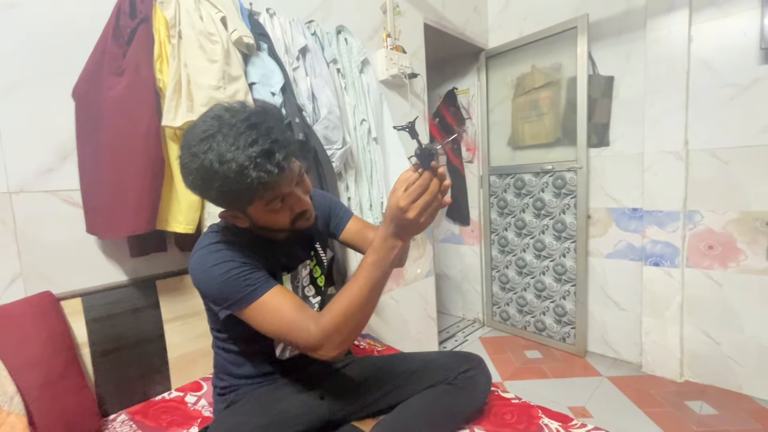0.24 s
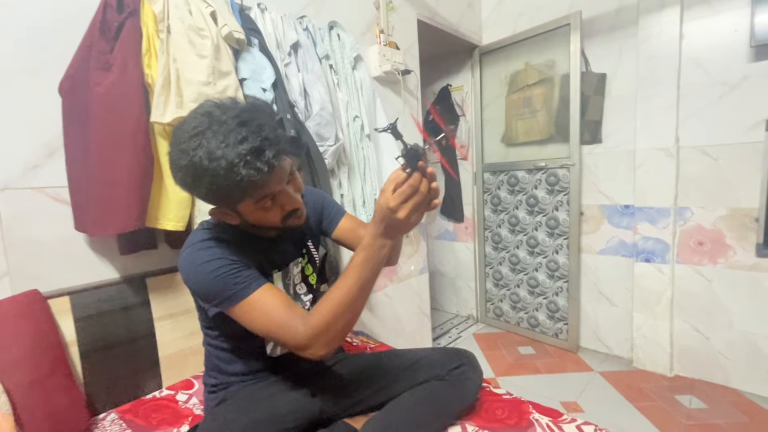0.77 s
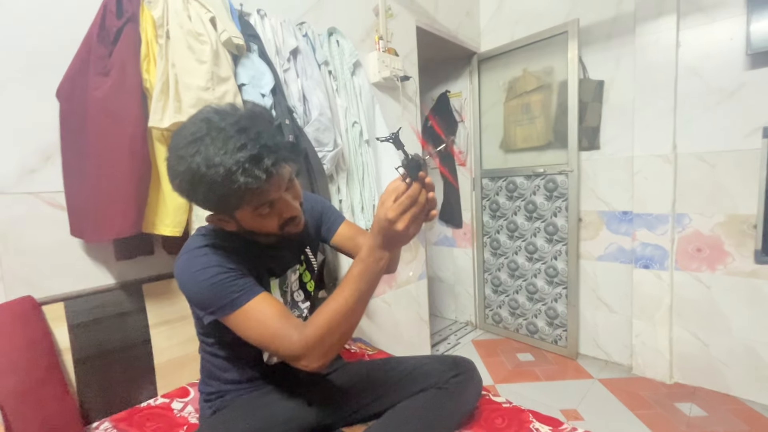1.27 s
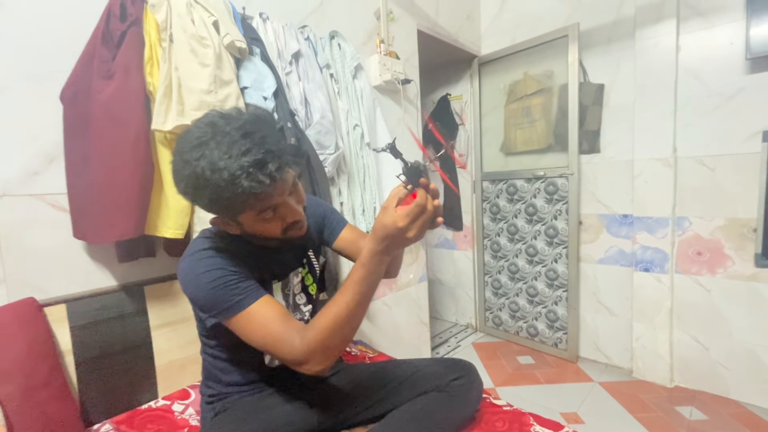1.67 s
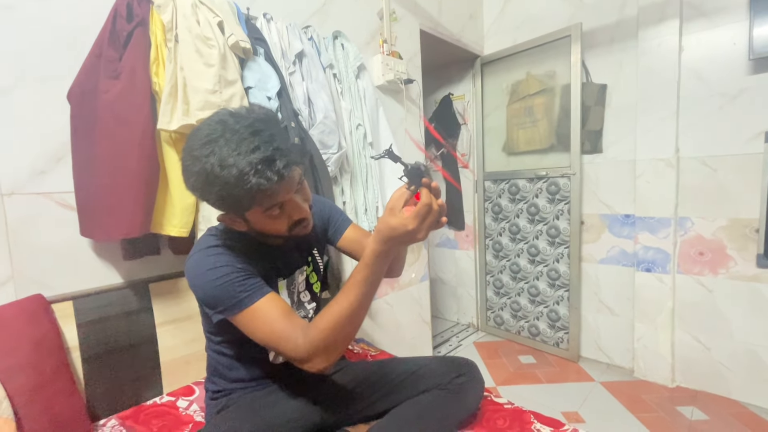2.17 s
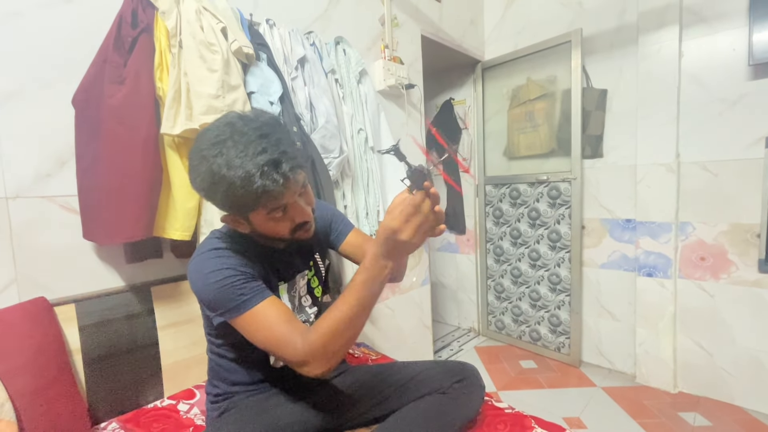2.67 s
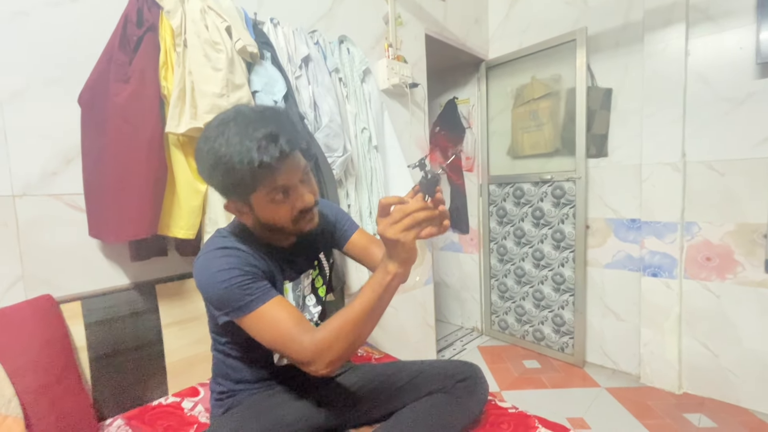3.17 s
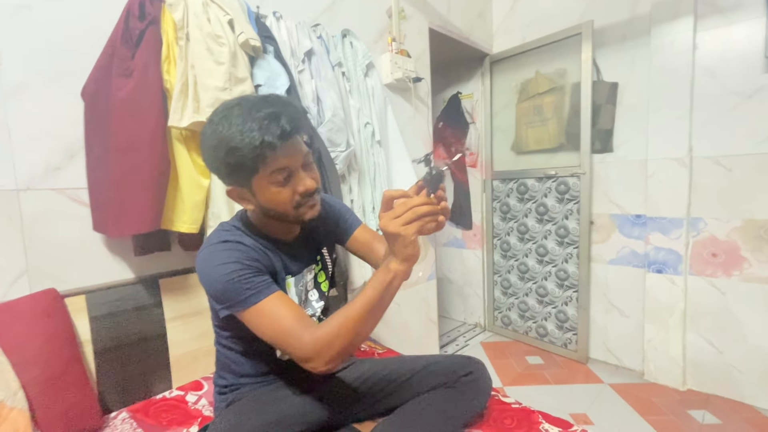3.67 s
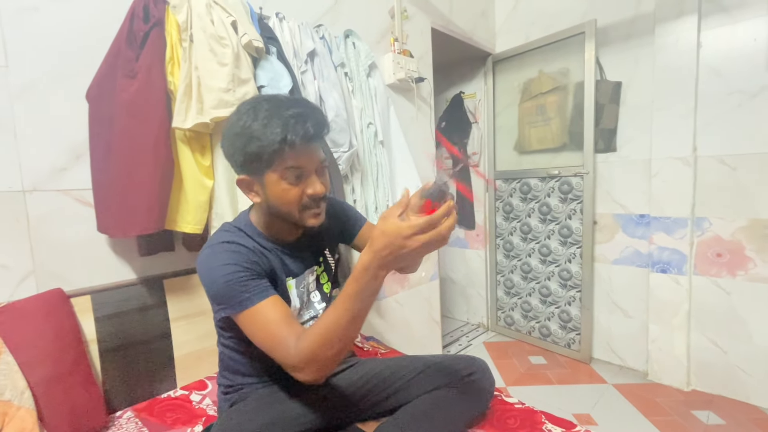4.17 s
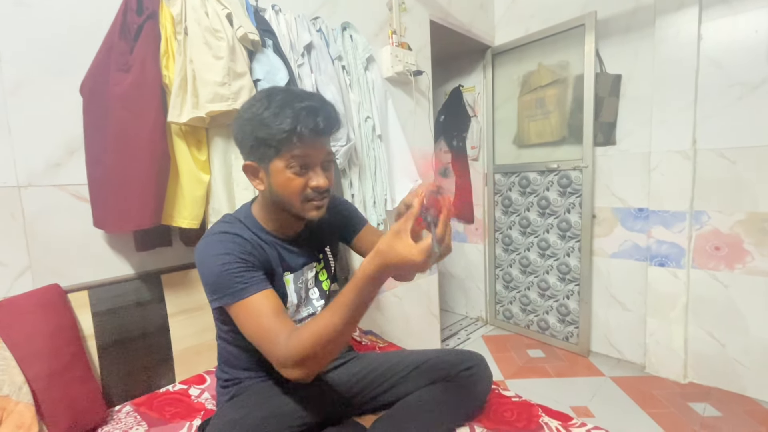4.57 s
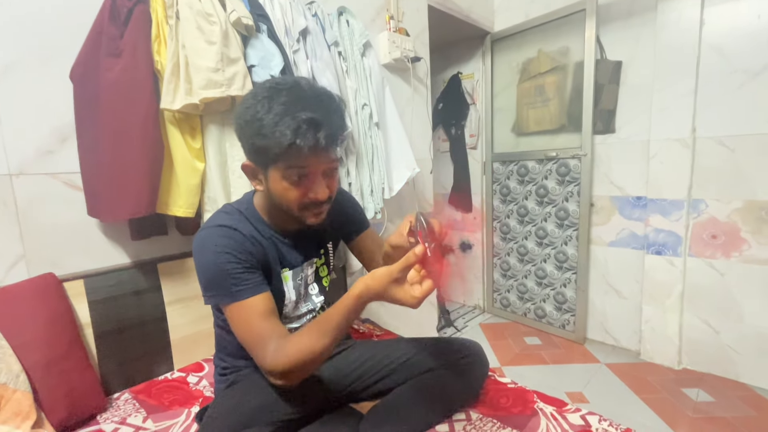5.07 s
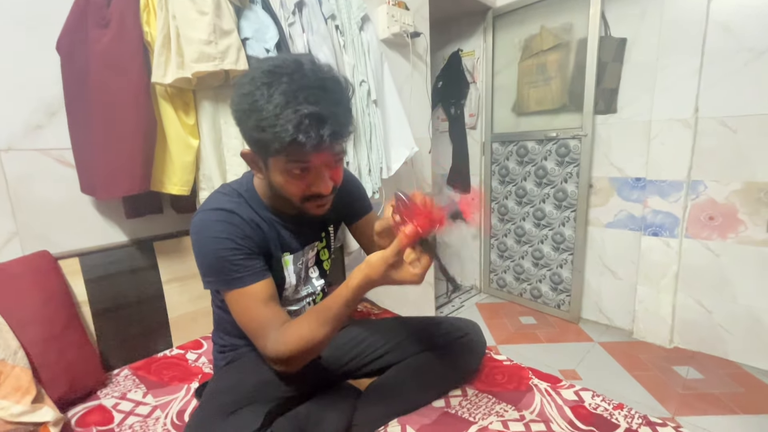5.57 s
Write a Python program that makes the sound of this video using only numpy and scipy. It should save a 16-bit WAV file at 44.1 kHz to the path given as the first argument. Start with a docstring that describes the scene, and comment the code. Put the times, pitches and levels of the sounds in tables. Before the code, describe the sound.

A toy helicopter is already running, close by and slightly to the left in a small tiled room. Its motor and gears make a high whine with a dense plastic rattle and blade hiss. The pitch wavers, rising around 1.5 seconds and dipping near 2. From about 3 to 4 seconds it stays higher and gains a thin, very high edge; a finger ticks faintly on the body at about 3.4 seconds. The pitch sags at 4.5 seconds and climbs again briefly. At about 4.7 seconds the power cuts: the whine falls and vanishes quickly, and the rattle fades over the next half second, with several light shell clicks before 5 seconds. One more click comes near 5.8 seconds. A faint low hum and steady room noise lie underneath throughout.

```python
"""A wavering gear whine and plastic rattle fill a small tiled room: a hand-held toy helicopter is running.
A tiny motor drives the rotor through two pairs of gears, whose teeth sound at the meshing rate and its
harmonics and rattle in the thin shell. Then the power is cut, the gears coast down clattering,
and a finger clicks on the shell. A low hum and room noise lie underneath."""
import sys
import numpy as np
from scipy import signal
from scipy.fft import rfft, irfft, next_fast_len
from scipy.io import wavfile

SR = 44100
rng = np.random.default_rng(int(sys.argv[2]) if len(sys.argv) > 2 else 0)


def output_pcm(signal):
    """Save a mono or channel-first signal as 16-bit PCM at the path in sys.argv[1].

    Samples are clipped to [-1, 1] before scaling.
    """
    pcm = np.clip(np.atleast_2d(signal).T, -1, 1) * 32767
    wavfile.write(sys.argv[1], SR, np.round(pcm).astype(np.int16))


N = 256794
PINION_TEETH, IDLER_TEETH = 8, 21
SHELL_LOW_HZ, SHELL_MID_HZ, SHELL_TOP_HZ = 2960, 6184, 11520   # resonances of the shell
STEP = 40   # samples between values of a slow random drift

# Uneven tooth contact, relative levels: time_s, fundamental_blur_db, second_blur_db, rattle_db
ROUGHNESS = [(0.0, -19, -22, -24.5), (0.37, -16, -15, -26), (0.88, -29, -13, -23),
             (0.91, -19.5, -30, -24.5), (0.93, -26, -19, -25.5), (1.33, -14.5, -12.5, -26.5),
             (1.36, -26, -15, -27), (1.46, -28, -16, -25), (1.7, -19, -16, -27),
             (1.74, -17.5, -15.5, -26.5), (2.19, -22, -14, -24.5), (2.62, -18, -15.5, -25.5),
             (2.83, -15.5, -19, -24), (2.89, -40, -18, -27.5), (2.92, -6.5, -15, -24),
             (3.04, -20, -15, -24.5), (3.26, -20, -23, -25), (3.31, -34, -38, -25), (3.5, -17, -24, -23),
             (3.6, -37, -15, -26), (3.66, -17, -19, -24), (3.71, -31, -24, -24.5), (3.81, -26, -23, -23.5),
             (3.82, -29, -18, -23), (3.87, -12, -26, -24.5), (3.89, -34, -31, -23), (3.97, -17, -29, -26),
             (4.02, -33, -30, -23.5), (4.03, -16, -34, -24.5), (4.21, -20, -32, -23),
             (4.27, -10.5, -15, -23.5), (4.32, -14, -17, -26), (4.45, -5, -14, -25.5),
             (4.47, -10, -12, -27), (4.55, -11.5, -20, -29.5), (4.58, -5, -21, -28), (4.61, -7, -16, -25.5),
             (4.72, -16.5, -11.5, -26.5), (4.74, -23, -42, -36), (4.77, -17.5, -25, -33.5),
             (4.81, -30, -20, -33), (4.82, -9, -22, -33), (4.85, -19, -26, -34.5), (4.9, -24, -19, -34),
             (4.93, -27, -27, -36), (4.98, -20, -19.5, -38), (5.0, -20, -23, -35),
             (5.17, -32.5, -32, -46.5), (5.38, -42, -30, -48.5), (5.77, -64, -54, -65)]


def gear_motion():
    """Meshing rate is shaft speed times tooth count; the force on the teeth collapses at the power cut."""
    # Pinion under power: time_s, mesh_hz
    powered = [(0.0, 3363), (0.11, 3226), (0.3, 3112), (0.33, 3125), (0.4, 3207), (0.49, 3292),
               (0.62, 3359), (0.85, 3380), (1.01, 3357), (1.19, 3354), (1.23, 3390), (1.29, 3526),
               (1.4, 3721), (1.46, 3802), (1.48, 3814), (1.5, 3789), (1.58, 3614), (1.68, 3333),
               (1.71, 3257), (1.82, 3149), (1.92, 3104), (2.0, 3141), (2.16, 3292), (2.28, 3340),
               (2.57, 3370), (2.83, 3349), (2.88, 3407), (2.97, 3628), (3.02, 3697), (3.18, 3811),
               (3.32, 3835), (3.54, 3791), (3.79, 3774), (4.05, 3705), (4.21, 3547), (4.27, 3461),
               (4.38, 3283), (4.48, 3066), (4.52, 3020), (4.54, 3011), (4.57, 3030), (4.61, 3101),
               (4.68, 3359), (4.73, 3491)]
    # Pinion coasting: time_s, mesh_hz
    coasting = [(4.77, 3400), (4.82, 2800), (4.9, 2050), (5.0, 1600), (5.1, 1900), (5.351, 1130),
                (5.82, 700)]
    mesh_hz, = in_time(powered + coasting)
    cut_s, drop_db, fade_db_per_s = 4.727, -11, 120
    t = np.arange(N) / SR
    load = amp(np.where(t > cut_s, drop_db - fade_db_per_s * (t - cut_s), 0))
    return mesh_hz, load


def harmonic_levels(mesh_hz):
    """Resonance: the third mesh harmonic stands out only while it lies in the shell's top band."""
    # Mesh harmonics before that weighting: time_s, fundamental_db, second_db, third_db
    harmonics = [(0.0, -33, -34, -42), (0.1, -24, -33, -41), (0.2, -30, -32, -40), (0.3, -26, -35, -43),
                 (0.4, -26, -32, -42), (0.5, -25, -28, -38), (0.6, -22, -30, -42), (0.7, -23, -30, -41),
                 (0.8, -21, -27, -42), (0.9, -22, -27, -43), (1.0, -24, -29, -42), (1.1, -23, -29, -46),
                 (1.2, -22, -31, -43), (1.3, -26, -28, -42), (1.4, -32, -30, -40), (1.5, -27, -32, -38),
                 (1.6, -31, -32, -43), (1.7, -27, -31, -42), (1.8, -27, -32, -42), (1.9, -27, -31, -43),
                 (2.0, -25, -31, -41), (2.1, -27, -27, -41), (2.2, -27, -29, -41), (2.3, -22, -30, -40),
                 (2.4, -26, -29, -40), (2.5, -27, -31, -39), (2.6, -29, -30, -41), (2.7, -28, -30, -41),
                 (2.8, -23, -27, -42), (2.9, -22, -28, -39), (3.0, -22, -28, -37), (3.1, -25, -31, -31),
                 (3.2, -26, -32, -27), (3.3, -28, -29, -27), (3.4, -28, -28, -28), (3.5, -27, -30, -31),
                 (3.6, -28, -27, -34), (3.7, -21, -28, -31), (3.8, -16, -29, -30), (3.9, -21, -29, -33),
                 (4.0, -21, -28, -37), (4.1, -23, -30, -43), (4.2, -24, -33, -43), (4.3, -22, -31, -44),
                 (4.4, -28, -30, -39), (4.5, -27, -29, -41), (4.6, -25, -31, -40), (4.7, -26, -23, -38)]
    fundamental_db, second_db, third_db = in_time(harmonics)
    detuning = (3 * mesh_hz - SHELL_TOP_HZ) / 700   # in half-widths of the resonance
    return fundamental_db, second_db, third_db - 10 * np.log10(1 + detuning ** 4)


def gear_whine(turns, levels_db):
    """Periodic forcing: the pinion's teeth engage at a regular rate and radiate a harmonic series."""
    mesh_phase = 2 * np.pi * PINION_TEETH * turns
    return sum(amp(level_db) * wavering_tone(k * mesh_phase, flicker_db=1.6, wander_rad=.45, apart_rad=.3)
               for k, level_db in enumerate(levels_db, 1))


def gear_sidebands(turns, mesh_hz, third_db):
    """Modulation: out-of-round gears add tones at sums of multiples of the motor and idler rates."""
    # Side tones (half orders come from alternating strong and weak turns): motor_order, idler_order
    orders = [(1, 0), (4, 0), (5, 0), (0, 8), (0, 16), (0, 17), (0, 24), (0, 32), (6.5, 0), (7, 0),
              (7.5, 0), (8, -1), (8, 1), (8.5, 0), (8, 8), (13, 0), (13.5, 0), (14.5, 0), (15, 0),
              (15.5, 0), (16, -1), (16.5, 0), (17, 0), (17.5, 0)]
    # Their strengths: low_speed_db, high_speed_db
    levels = [(-55, -50), (-53, -55), (-58, -52), (-38, -39), (-46, -37), (-52, -42), (-54, -45),
              (-46, -44), (-43, -55), (-35, -35), (-39, -51), (-47, -43), (-42, -33), (-36, -51),
              (-51, -45), (-48, -44), (-41, -46), (-36, -48), (-40, -32), (-34, -48), (-42, -41),
              (-33, -46), (-35, -37), (-39, -50)]
    # Sidebands of the third harmonic: motor_order, idler_order
    top_orders = [(24, -1), (24, 1), (25, 0), (25, 1)]
    # Their strengths relative to that harmonic: level_db
    top_levels = [-10, -5, -5, -10]
    low_speed_hz, high_speed_hz = 3500, 3750
    fast = np.clip((mesh_hz - low_speed_hz) / (high_speed_hz - low_speed_hz), 0, 1)
    motor_phase = 2 * np.pi * turns
    idler_phase = motor_phase * PINION_TEETH / IDLER_TEETH
    out = np.zeros((2, N))
    for (motor, idler), (low_db, high_db) in zip(orders, levels):
        phase = motor * motor_phase + idler * idler_phase
        gain = amp(low_db) + fast * (amp(high_db) - amp(low_db))
        out += gain * wavering_tone(phase, flicker_db=2, wander_rad=.6, apart_rad=.5)
    for (motor, idler), level_db in zip(top_orders, top_levels):
        phase = motor * motor_phase + idler * idler_phase
        gain = amp(third_db + level_db)
        out += gain * wavering_tone(phase, flicker_db=7.5, wander_rad=.9, apart_rad=.81)
    return out


def tooth_blur(mesh_hz, load):
    """Random modulation: no two teeth meet alike, which spreads bands of noise round the tones."""
    # Bands at the fundamental, second harmonic and top shell resonance: half_width_hz, gain_db
    bands = [(260, -5), (700, -4), (430, -2)]
    # Hiss in the top resonance, relative level: time_s, level_db
    top_hiss = [(0.0, -34), (0.04, -30), (0.06, -34), (0.57, -41), (1.28, -37), (1.33, -25), (1.37, -33),
                (1.44, -28), (1.62, -39), (2.32, -37), (2.69, -35), (2.77, -26), (2.86, -30), (2.99, -23),
                (3.24, -25), (3.32, -31), (3.33, -27), (3.61, -31), (3.62, -25), (3.86, -27), (3.94, -19),
                (3.96, -23), (4.0, -14), (4.08, -25), (4.57, -41), (4.6, -34), (4.73, -37)]
    fundamental_db, second_db, _ = in_time(ROUGHNESS)
    levels_db = [fundamental_db, second_db, in_time(top_hiss)[0] + 20 * np.log10(load)]
    # the shell's resonances keep the bands from following the speed fully
    centres_hz = [np.maximum(mesh_hz, SHELL_LOW_HZ),
                  .7 * 2 * mesh_hz + .3 * SHELL_MID_HZ,
                  np.full(N, SHELL_TOP_HZ)]
    phases = 2 * np.pi * np.cumsum(centres_hz, axis=1) / SR
    out = 0
    for (half_width_hz, gain_db), phase, level_db in zip(bands, phases, levels_db):
        lowpass = signal.butter(2, half_width_hz, fs=SR, output="sos")
        uneven = signal.sosfilt(lowpass, rng.standard_normal((2, 2, N)))
        band = uneven[0] * np.cos(phase) + uneven[1] * np.sin(phase)
        flicker_db = 2 * per_sample(drift(corner_hz=49))
        out = out + amp(level_db + gain_db + flicker_db) * rms_one(band)
    return stereo(out, treble_lags=True)


def rattle(ticks_per_s, spread_db, gain_db):
    """Shot noise: random ticks of loose teeth and air hiss from the blades, filtered by the shell."""
    # Response of the thin shell: frequency_hz, gain_db
    shell = [(470, -48), (800, -18), (1010, -31), (1440, -7), (2140, -14.5), (2540, -10), (2800, -0.5),
             (3900, -0.5), (4460, -4.5), (5990, 1.5), (10000, -6), (11500, -3.5), (12700, -9),
             (14000, -8.5), (15000, -3)]
    sizes = amp(spread_db * np.minimum(rng.exponential(1, (2, N)), 5))
    signs = rng.choice([-1, 1], (2, N))
    ticks = rms_one(sizes * signs * (rng.random((2, N)) < ticks_per_s / SR))
    blade_hiss = 3.6 * rng.standard_normal((2, N))
    radiated = stereo(colour(ticks + blade_hiss, shell), treble_lags=True)
    _, _, level_db = in_time(ROUGHNESS)
    flicker_db = 1.5 * per_sample(drift(corner_hz=17))
    return amp(level_db + gain_db + flicker_db) * rms_one(radiated)


def finger_taps():
    """Friction: a rubbing finger catches on the body and excites a few heavily damped modes."""
    # Catches of the finger, relative strength: start_s, level_db
    taps = [(3.4216, -16), (3.4391, -12.5), (3.4514, -20), (3.4624, -24)]
    # Modes of the body: pitch_hz, level_db, t60_s
    modes = [(1520, 7.5, .02), (1150, -19, .015), (1700, -9, .012)]
    return struck_modes(taps, modes, gain_db=-4)


def shell_clicks():
    """Impact excitation: knocks on the shell set its high modes ringing briefly."""
    # Knocks, relative strength: start_s, level_db
    clicks = [(4.6644, -21), (4.8092, -10), (4.824, -8), (4.8675, -8.5), (4.9063, -11), (4.9805, -23),
              (5.7856, -4), (5.796, -27)]
    # Modes of the shell: pitch_hz, level_db, t60_s
    modes = [(3040, -4, 0.041), (3870, -5, .02), (3960, 0, 0.046), (4240, 0, 0.034), (4570, 6.5, 0.012),
             (4710, 0, 0.011), (5200, -16, 0.012), (5350, -5, 0.046), (5880, -4, 0.018), (6700, -4, 0.023),
             (7070, 4, .01), (8400, 4, 0.0062), (9660, 4, 0.0069), (11500, -5, 0.0072), (12500, -10, .006),
             (13800, -2, .006)]
    return struck_modes(clicks, modes, gain_db=-15)


def struck_modes(blows, modes, gain_db, contact_s=.0025):
    """Modal superposition: each short, rough contact drives every damped mode with its own strength."""
    window = np.hanning(round(contact_s * SR))
    starts = [round(start_s * SR) for start_s, _ in blows]
    blow_db = np.array(blows)[:, 1] + gain_db
    scatter_db = rng.normal(0, .75, (len(blows), len(modes)))
    out = np.zeros(N)
    for k, (pitch_hz, level_db, t60_s) in enumerate(modes):
        impulses = np.full(N, 1e-18)
        impulses[starts] = amp(blow_db + level_db + scatter_db[:, k])
        contact = rms_one(window * rng.standard_normal(len(window))) / np.sqrt(len(window))
        force = np.convolve(impulses, contact)[:N]
        radius, angle = amp(-60 / (t60_s * SR)), 2 * np.pi * pitch_hz / SR
        out += signal.lfilter([0, np.sin(angle)], [1, -2 * radius * np.cos(angle), radius ** 2], force)
    return out


def reverberation(x, t60_s, gain_db):
    """Diffuse field: tiled walls return a dense, exponentially decaying tail, unrelated in the two ears."""
    t = np.arange(int(.4 * SR)) / SR
    tail = rng.standard_normal((2, len(t))) * amp(-60 * t / t60_s) * (t > .006)
    tail /= np.sqrt(np.sum(tail ** 2, axis=1, keepdims=True))
    return amp(gain_db) * signal.fftconvolve(x, tail, axes=1)[:, :N]


def room_noise(level_db):
    """Filtered white noise: a steady broadband floor, strongest in the low and middle range."""
    # Spectral density of the floor: frequency_hz, level_db
    spectrum = [(88, -26), (150, -14), (229, -10), (289, -7.5), (441, -8.5), (468, -10), (535, -5.5),
                (757, -9.5), (1230, -6), (1800, -12.5), (2180, -14.5), (2550, -12), (3210, -12),
                (9270, -25.5), (15000, -66)]
    noise = colour(rng.standard_normal((2, N)), spectrum + [(SR / 2, -90)])
    return amp(level_db) * rms_one(stereo(noise))


def low_hum(pitch_hz):
    """Narrow-band resonance: noise held in sharp low peaks wavers round one hum tone."""
    # Resonances: centre_hz, width_hz, relative_db
    resonances = [(55.4, 7.3, -8), (63.2, 3.4, -7.5), (99.8, 14, -13.5), (124, 7.9, -11), (140.7, 8, -14.5),
                  (250.2, 7, -17)]
    # Swell of the whole hum: time_s, gain_db
    swell = [(0.0, -38), (0.08, -29.5), (1.25, -36.5), (1.31, -33), (1.49, -39), (1.59, -33.5), (1.72, -40),
             (1.89, -31), (2.01, -40), (2.11, -32), (2.3, -35.5), (2.45, -31), (2.58, -39), (2.92, -36.5),
             (3.0, -40.5), (3.32, -33), (3.45, -35), (4.15, -34.5), (4.23, -30.5), (4.41, -35.5),
             (4.49, -30.5), (4.62, -38.5), (4.73, -35), (4.86, -39), (5.62, -35.5), (5.69, -37),
             (5.82, -34)]
    phase = 2 * np.pi * pitch_hz * np.arange(N) / SR
    hum = amp(-1.5) * wavering_tone(phase, flicker_db=1.5, wander_rad=1, apart_rad=.041)[:1]
    for centre_hz, width_hz, relative_db in resonances:
        radius, angle = np.exp(-np.pi * width_hz / SR), 2 * np.pi * centre_hz / SR
        held = rng.standard_normal((2, N + SR)) * [[1], [.25]]
        for _ in range(2):   # two passes deepen the valleys between the peaks
            held = signal.lfilter([1, 0, -1], [1, -2 * radius * np.cos(angle), radius ** 2], held)
        mid, side = held[:, SR:]
        hum = hum + amp(relative_db) * rms_one(np.array([mid + side, mid - side]))
    return amp(in_time(swell)[0]) * hum


def wavering_tone(phase, flicker_db, wander_rad, apart_rad):
    """Amplitude and phase modulation: a tone of rms near 1 drifts, partly on its own in each ear."""
    chance = drift(corner_hz=8, count=6)
    level = per_sample(amp(flicker_db * (chance[0] + .7 * chance[1:3])))
    slip = per_sample(wander_rad * chance[3] + apart_rad * chance[4:6])
    offset = rng.uniform(0, 2 * np.pi) + 2 * apart_rad * rng.standard_normal((2, 1))
    return np.sqrt(2) * level * np.sin(phase + slip + offset)


def stereo(pair, treble_lags=False):
    """Interaural coherence: two unrelated signals mix into left and right, alike to a set degree."""
    # Likeness of left and right: frequency_hz, coherence
    likeness = [(60, 0.99), (150, 0.23), (370, 0.84), (940, 0.13), (2340, 0.72), (5840, 0.0083),
                (14600, 0.87)]
    size = next_fast_len(N)
    mid, side = rfft(pair, size)
    hz = np.fft.rfftfreq(size, 1 / SR)
    coherence = np.clip(at_hz(likeness, hz), 0, .99)
    ears = np.sqrt(1 + coherence) * mid + np.sqrt(1 - coherence) * side * [[1], [-1]]
    if treble_lags:   # the left is the far side
        lag_s, lag_from_hz = .00027, 1500
        ears[0] *= np.exp(-2j * np.pi * np.maximum(hz - lag_from_hz, 0) * lag_s)
    return irfft(ears, size)[:, :N] / np.sqrt(2)


def colour(x, spectrum):
    """Minimum-phase filtering: folding the cepstrum gives a causal response with the given spectrum."""
    gain = amp(at_hz(spectrum, np.fft.rfftfreq(8192, 1 / SR)))
    cepstrum = irfft(np.log(gain))
    cepstrum[1:4096] *= 2
    cepstrum[4097:] = 0
    response = irfft(np.exp(rfft(cepstrum)))[None, :4096]
    return signal.fftconvolve(x, response, axes=1)[:, :N]


def drift(corner_hz, count=1):
    """Low-passed noise: slow random curves of unit spread, one value every STEP samples."""
    pole = np.exp(-2 * np.pi * STEP * corner_hz / SR)
    noise = rng.standard_normal((count, N // STEP + 2002))
    slow = signal.lfilter([1], [1, -2 * pole, pole ** 2], noise)[:, 2000:]   # once the filter has settled
    return slow / np.std(slow, axis=1, keepdims=True)


def per_sample(curves):
    """Interpolate drift curves to one value a sample."""
    return np.array([np.interp(np.arange(N) / STEP, np.arange(len(curve)), curve) for curve in curves])


def in_time(rows):
    """Interpolate each column of a time table to one value a sample."""
    time_s, *columns = np.transpose(rows)
    return [np.interp(np.arange(N) / SR, time_s, column) for column in columns]


def at_hz(rows, hz):
    """Read a spectrum table on a log-frequency axis."""
    table_hz, values = np.transpose(rows)
    return np.interp(np.log(np.maximum(hz, 1)), np.log(table_hz), values)


def amp(db):
    """Decibels to gain."""
    return 10 ** (np.asarray(db) / 20)


def rms_one(x):
    """Scale to unit rms."""
    return x / np.sqrt(np.mean(x ** 2) + 1e-20)


def scene():
    """Superposition: gears, knocks and their reverberation add to the room noise and hum."""
    mesh_hz, load = gear_motion()
    turns = np.cumsum(mesh_hz / PINION_TEETH) / SR
    levels_db = harmonic_levels(mesh_hz)
    sidebands = load * gear_sidebands(turns, mesh_hz, third_db=levels_db[2])
    whine = load * gear_whine(turns, levels_db)
    blur = tooth_blur(mesh_hz, load)
    knocks = finger_taps() + shell_clicks()
    echoes = reverberation(sidebands + knocks + amp(-9) * (whine + blur), t60_s=.3, gain_db=-3)
    clatter = rattle(ticks_per_s=1500, spread_db=2.5, gain_db=10.5)
    background = room_noise(level_db=-34.5) + low_hum(pitch_hz=73.5)
    return whine + sidebands + blur + clatter + knocks + echoes + background


def record(dry):
    """Level difference and saturation: all but the top leans left, peaks round off, the top is cut."""
    # Balance of the channels: frequency_hz, left_minus_right_db
    balance = [(60, 5), (180, 1), (540, 2.5), (1620, 2.5), (4860, 4), (14600, -1.5)]
    ceiling, cutoff_hz = 1.1, 14650
    size = next_fast_len(N)
    difference_db = at_hz(balance, np.fft.rfftfreq(size, 1 / SR))
    leaned = irfft(rfft(dry, size) * amp(difference_db / 2 * [[1], [-1]]), size)[:, :N]
    lowpass = signal.ellip(12, .5, 70, cutoff_hz, fs=SR, output="sos")
    return signal.sosfilt(lowpass, ceiling * np.tanh(leaned / ceiling))


dry = scene()
out = record(dry)
output_pcm(out)
```